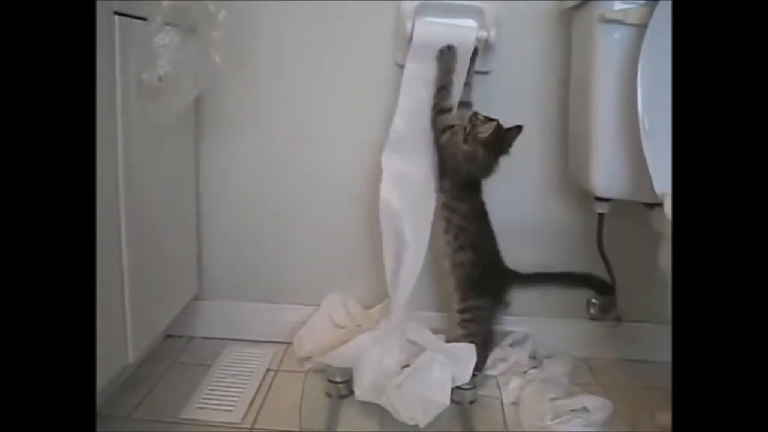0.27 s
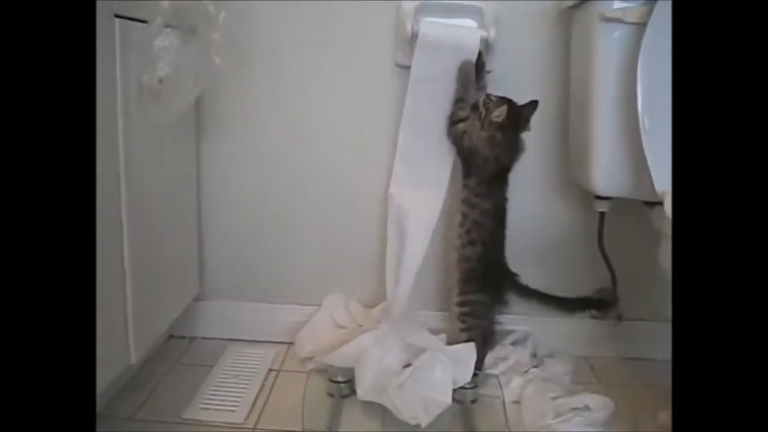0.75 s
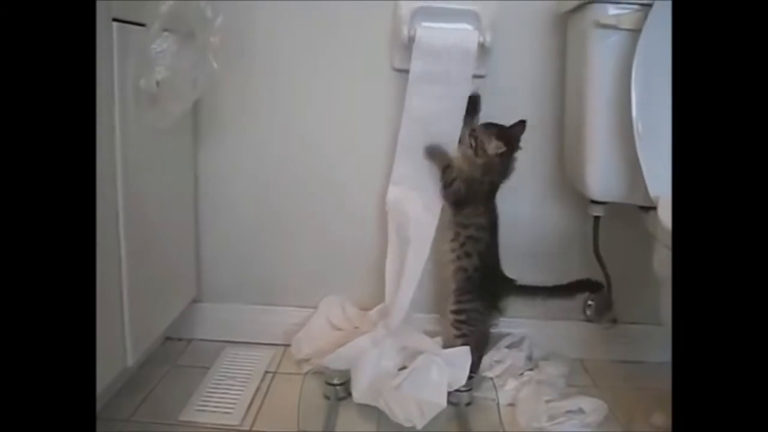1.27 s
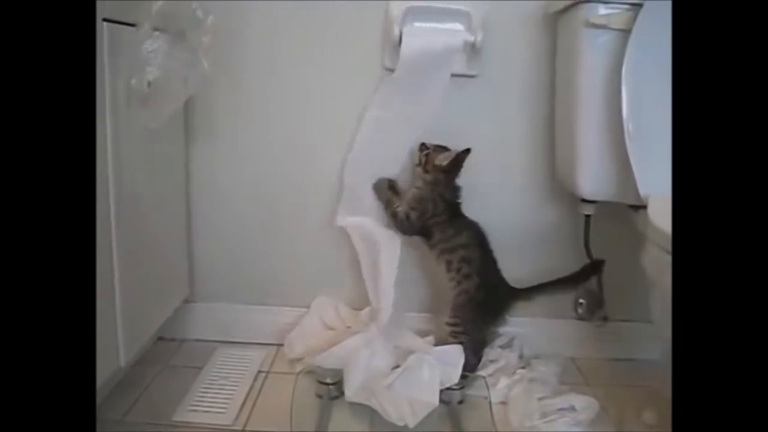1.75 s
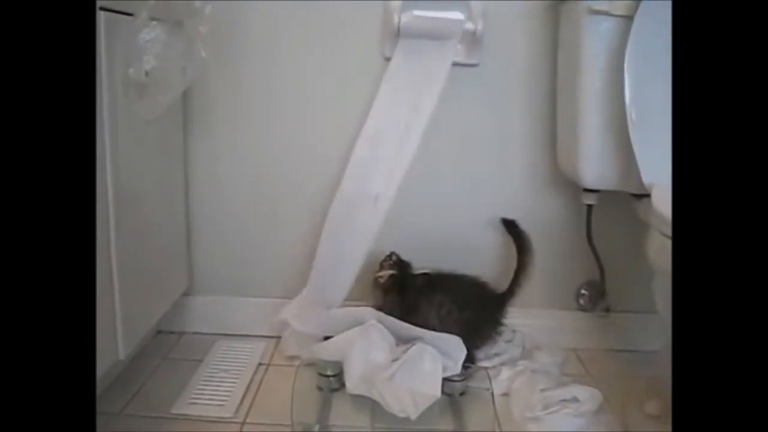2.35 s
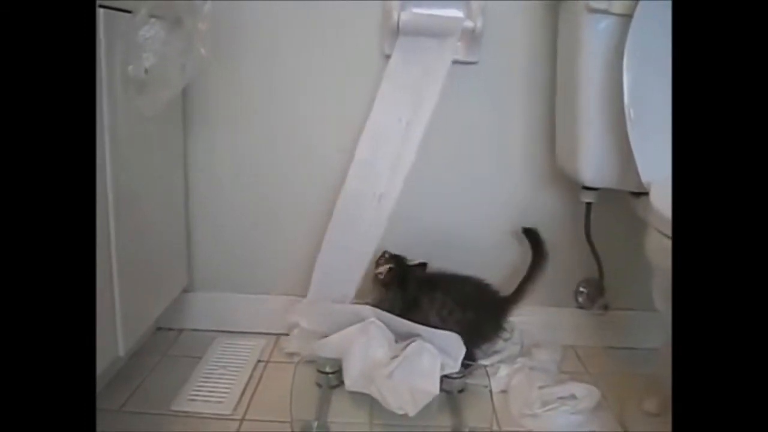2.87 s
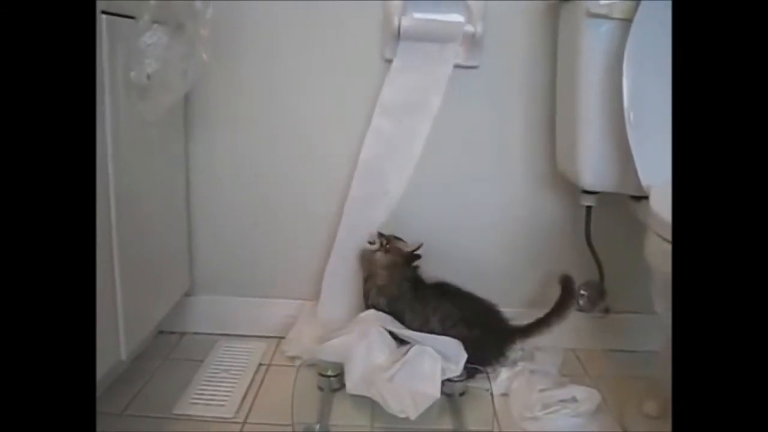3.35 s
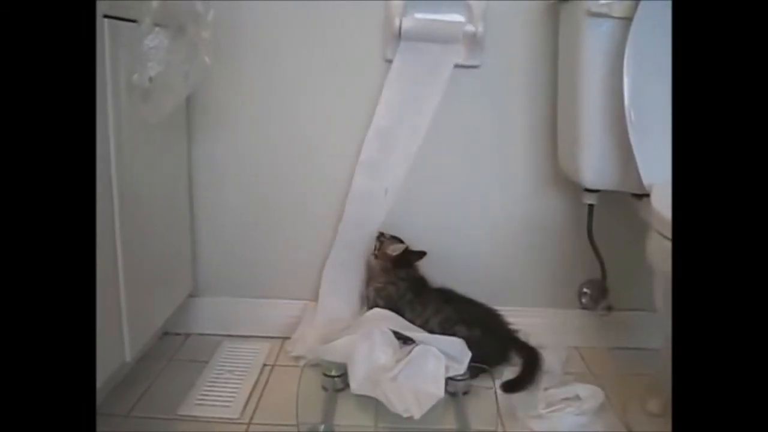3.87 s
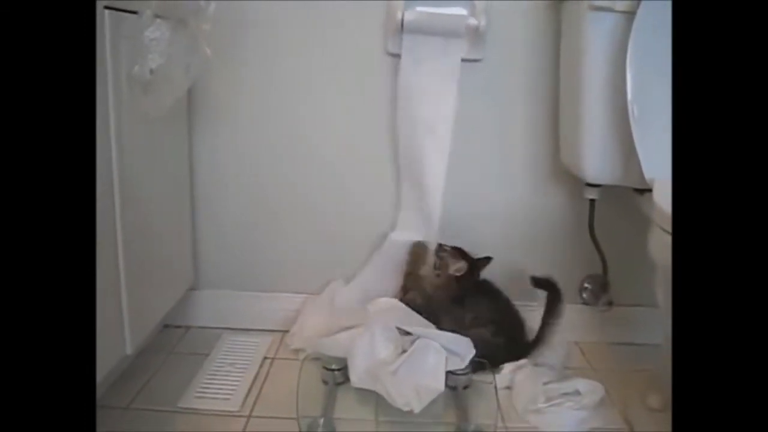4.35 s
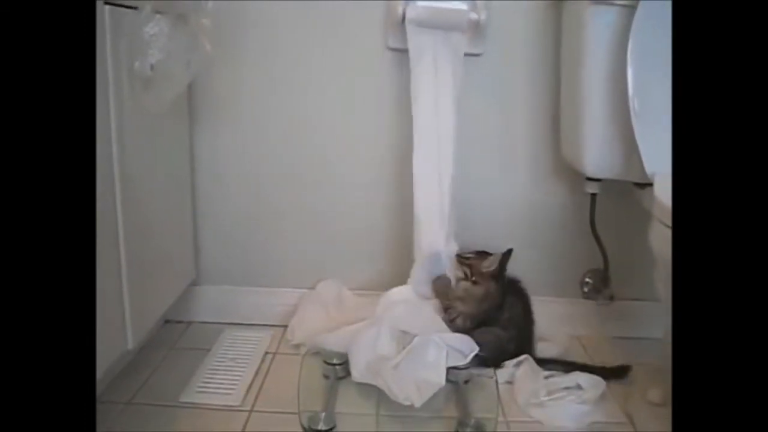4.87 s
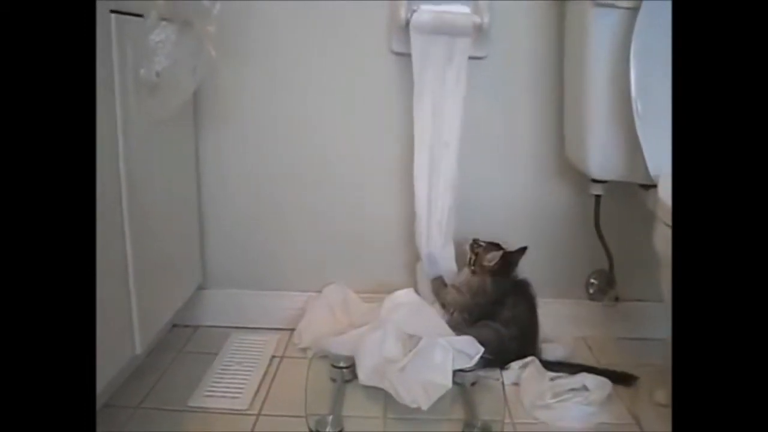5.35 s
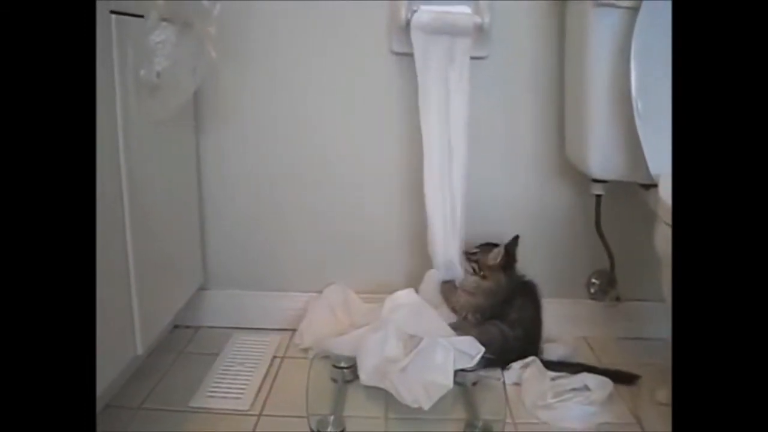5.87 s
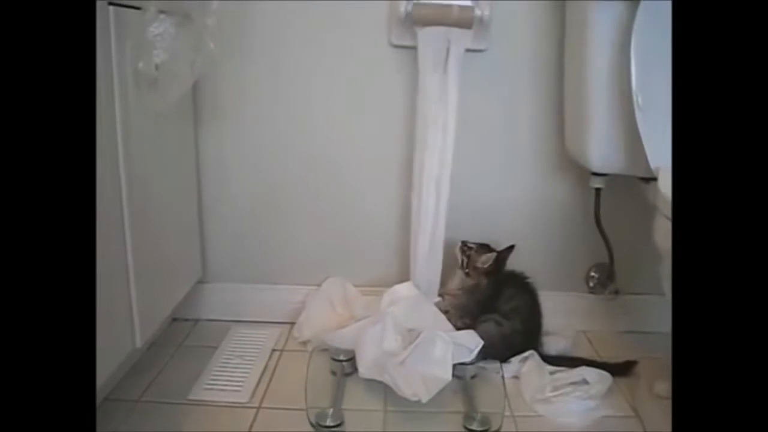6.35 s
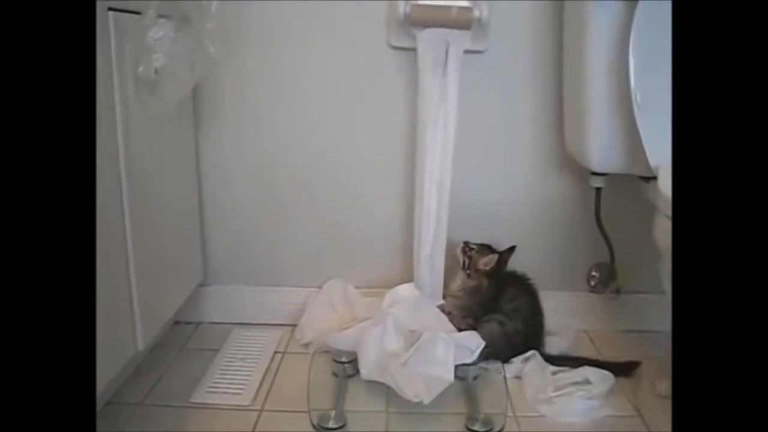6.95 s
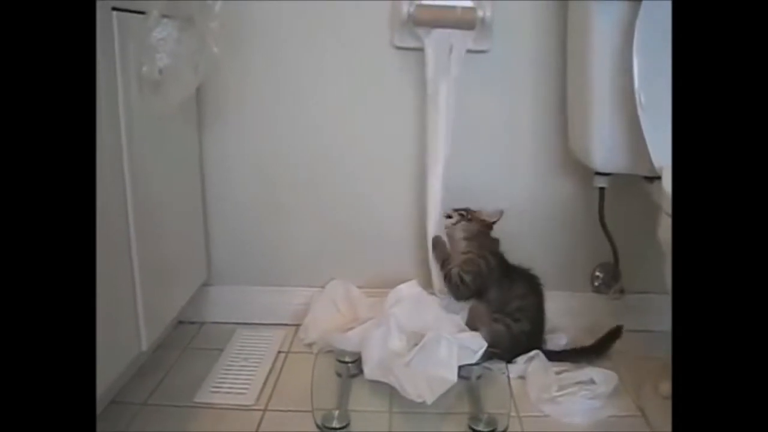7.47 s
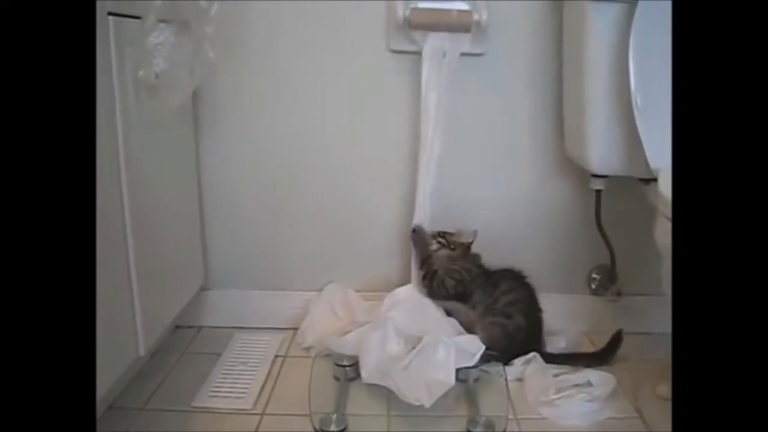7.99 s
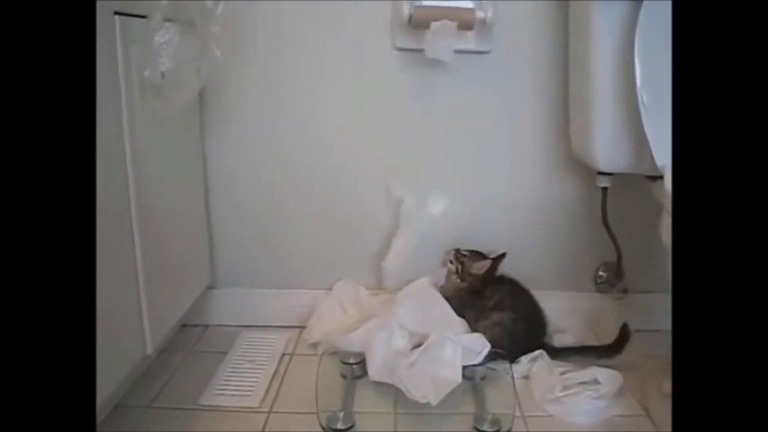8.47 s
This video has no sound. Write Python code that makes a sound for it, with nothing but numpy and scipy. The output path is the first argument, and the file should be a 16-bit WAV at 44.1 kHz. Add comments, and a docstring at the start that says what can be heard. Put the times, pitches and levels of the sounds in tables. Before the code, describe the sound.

In a small tiled bathroom, a kitten paws at hanging tissue. Loud plastic clacks and cardboard knocks come with the first swipes, then a rumbling turn of the tube ends in a sharp snap around two seconds. A quiet stretch follows, then scattered crinkles and small snaps, a strong crackling tug near six seconds, and a final tearing flurry. Fixed microphone nearby, faint ventilation hum.

```python
"""In a small tiled bathroom a kitten claws and tugs tissue paper off a wall roll.
The paper is clumped cracks and friction noise under swelling envelopes; snaps are short tuned noise bursts.
The plastic spindle clacks and the cardboard tube knocks as struck resonant modes; the loose tube also rubs.
The room adds an echo and a diffuse tail; a ventilation hum and faint hiss of filtered noise lie underneath."""
import sys
import numpy as np
from scipy import signal
from scipy.fft import rfft, irfft
from scipy.io import wavfile

SR = 44100
rng = np.random.default_rng(int(sys.argv[2]) if len(sys.argv) > 2 else 0)


def int16_out(signal):
    """Quantize to a 16-bit WAV file."""
    q = np.round(np.clip(np.atleast_2d(signal).T, -1, 1) * 32767)
    wavfile.write(sys.argv[1], SR, q.astype(np.int16))


N = 384544

# Tugs and swipes at the paper; swell and fade are the times for 20 dB. Each row: start of full strength
# in seconds, level in dB, swell in seconds, hold in seconds, fade in seconds, brightness in dB.
TUGS = [(0.103, -31, 0.022, 0.098, .13, -6), (0.256, -43.5, .05, 0.032, 0.06, 5),
        (0.372, -47.5, 0.0084, .03, 0.091, 9), (0.422, -37, .06, 0.08, 0.049, 2),
        (0.57, -39, 0.0062, 0, 0.11, 4), (0.9, -51.5, 0.05, 0.012, 0.083, 1),
        (1.002, -53, 0.078, 0.036, 0.058, 1.5), (1.16, -45, .015, 0.02, 0.053, 4.5),
        (1.271, -35.5, 0.011, 0.00064, 0.084, 2.5), (1.553, -48, 0.035, 0, 0.14, -0.5),
        (1.79, -44.5, 0.11, 0.13, .05, -3), (1.934, -30.5, 0.052, 0.14, 0.091, -2),
        (2.948, -48, 0.084, 0.059, 0.068, 0.5), (3.748, -51, 0.023, 0, 0.11, -8.5),
        (4.192, -47.5, .005, 0.055, 0.11, -1.5), (4.358, -52.5, 0.11, 0.019, .15, -1),
        (4.455, -50, 0.091, 0.12, 0.26, -1.5), (4.684, -55.5, 0.039, 0.029, 0.11, 10),
        (4.784, -39, 0.071, 0.022, 0.21, -0.5), (4.905, -47, .05, 0.011, 0.22, 2),
        (5.135, -45, 0.22, .03, .05, 3), (5.242, -47, 0.16, 0.004, 0.064, 5),
        (5.44, -60, 0.027, 0, 0.22, 5.5), (5.82, -68, 0.074, 0, .07, 4), (6.081, -40.5, .12, 0.15, 0.13, 8),
        (6.208, -31, 0.13, 0.06, 0.1, -2.5), (7.034, -39.5, 0.037, 0.036, 0.11, -0.5),
        (7.251, -48, 0.19, 0.085, 0.09, -1), (7.356, -44.5, 0.0081, 0.036, 0.11, 1),
        (7.526, -47.5, 0.068, 0.019, 0.14, 1), (7.678, -52.5, .05, 0.064, .05, 2),
        (7.743, -39, 0.084, 0.0063, 0.16, 2.5), (7.872, -52.5, .02, 0.011, .07, -11),
        (8.028, -48.5, 0.043, 0, .1, 5), (8.073, -47, 0.018, 0.028, .05, 6),
        (8.138, -33, 0.022, 0.031, 0.073, 4), (8.218, -36.5, 0.11, 0.089, 0.12, 3),
        (8.434, -44, 0.16, 0.074, 0.15, -1)]
# Faint rustle of the hanging strip and the heap between tugs. Each row: time in seconds, level in dB.
STIR = [(0, -57.5), (0.7, -68), (0.85, -67.5), (1.5, -61.5), (2.3, -56.5), (2.4, -64), (2.8, -70.5),
        (3.1, -57), (3.7, -62), (4.15, -66), (4.3, -55.5), (5.3, -58.5), (5.55, -74.5), (5.9, -62),
        (6.499, -68.5), (6.9, -68), (7.2, -66.5), (8.72, -59.5)]
# Paws and body landing on floor and heap. Each row: start of full strength in seconds, level in dB,
# hold in seconds.
THUMPS = [(0.125, -46.5, 0.11), (0.583, -53, 0.022), (1.286, -46, 0.024), (1.62, -60.5, 0.18),
          (1.924, -46, 0.2), (4.57, -60.5, 0.11), (4.794, -48.5, 0.029), (5.14, -64, 0.11),
          (6.25, -51.5, 0.053), (7.05, -60, 0.026), (7.326, -58, 0.13), (7.74, -60, .03),
          (8.227, -54.5, 0.085)]
# Claws and creases snapping. Each row: start in seconds, peak in dB, pitch in Hz.
SNAPS = [(0.371, -36, 5350), (0.4744, -32, 3700), (0.4933, -30, 2290), (1.5574, -36, 5970),
         (1.6144, -33, 3300), (1.9674, -14, 4000), (1.996, -21, 1570), (2.043, -24, 1490),
         (2.93, -39, 2360), (3.278, -41, 4140), (3.7473, -36, 1590), (4.1854, -36, 2960),
         (4.1993, -28, 2890), (4.2179, -25.5, 2960), (4.246, -33.5, 1710), (4.479, -34, 1540),
         (4.589, -35, 3600), (4.6777, -29.5, 4530), (4.703, -34, 4460), (4.7499, -28.5, 4230),
         (4.897, -28.5, 5930), (4.971, -32, 4000), (5.024, -33, 3840), (5.0506, -27, 3840),
         (5.0942, -29.5, 3900), (5.112, -35, 9000), (5.128, -24, 3800), (5.148, -33, 4800),
         (5.228, -31.5, 3870), (5.4415, -48, 5070), (5.7109, -50, 4090), (5.7805, -46, 3830),
         (5.8127, -33, 5300), (6.0013, -36, 3150), (6.0454, -28.5, 4300), (6.07, -31, 4000),
         (6.116, -18.5, 3270), (6.127, -23, 4300), (6.144, -19.5, 6070), (6.177, -20, 3900),
         (6.2077, -15, 4100), (6.228, -18.5, 5570), (6.741, -47, 2630), (6.902, -41, 1960),
         (7.238, -31, 2900), (7.2784, -31, 8940), (7.3073, -27.5, 1940), (7.3557, -29.5, 5500),
         (7.382, -32, 4600), (7.414, -29.5, 3120), (7.5009, -34.5, 4920), (7.573, -38, 8000),
         (7.674, -28.5, 4030), (7.7176, -27, 4080), (7.738, -26, 5110), (7.791, -32, 4860),
         (7.872, -32.5, 1580), (8.031, -31.5, 4900), (8.073, -32.5, 3880), (8.1349, -21.5, 4240),
         (8.145, -30, 3890), (8.161, -19.5, 3970), (8.1833, -18.5, 4900), (8.2194, -37, 2800),
         (8.259, -22.5, 2450), (8.358, -24, 8100), (8.3772, -26, 2500), (8.4402, -30, 2500)]
# Spindle clacking in its holder. Each row: start in seconds, nominal peak in dB, brightness in dB per octave.
CLACKS = [(0.085, -22, -5.5), (0.098, -10.5, -7), (0.1011, -7, -4.5), (0.1587, -18, -3), (0.5727, -12, 8),
          (0.892, -36.5, -3), (0.9034, -35, -9), (0.974, -40, -12), (0.993, -35.5, -3), (1.014, -33.5, -3),
          (1.029, -37, 0), (1.133, -35.5, 4), (1.1686, -35.5, -3), (1.265, -20, -5), (1.565, -38, -6),
          (1.649, -44, -3), (1.6693, -39, -30), (1.7808, -26.5, -13), (1.8357, -42, -3), (1.8817, -23, -9),
          (1.9103, -12, -11), (1.954, -13.5, -27)]
# Tube knocking on the spindle. Each row: start in seconds, nominal peak in dB, hollowness from 0 to 1.
KNOCKS = [(0.1022, -13.5, 0.25), (0.1561, -18.5, 0.27), (0.4216, -37, 0.4), (0.8928, -40.5, 0.48),
          (1.1333, -50, 0.8), (1.2804, -14.5, 0), (1.2911, -13.5, 0.05), (1.5957, -31, 0.52),
          (1.6697, -35.5, 0.55), (1.735, -27, 0.46), (1.782, -32.5, 0.1), (1.8374, -35, 0.4),
          (1.8885, -24, 0.4), (1.928, -35, 0.2), (1.9565, -17, 0.53)]
# Loose tube rubbing round the spindle. Each row: time in seconds, mean level in dB.
ROLLING = [(1.52, -74), (1.56, -64), (1.594, -54), (1.702, -55.5), (1.728, -54.5), (1.858, -47.5),
           (1.884, -48), (1.98, -41), (2.026, -40), (2.12, -62)]

# Resonant modes of the spindle, the tube's wall and the air inside the tube, when struck.
# Each row: frequency in Hz, relative level in dB, time to decay by 60 dB in seconds.
SPINDLE = [(3050, -21, .015), (3800, -12, .018), (4050, -7, .024), (4230, -9, .024), (4680, -8, .02),
           (5450, -9, .026), (5800, -10, .026), (6100, -11, .026), (6800, -18, .015), (8800, -19, .008),
           (10500, -18, .006)]
TUBE_WALL = [(840, -40.5, 0.0069), (1417, -32, 0.0084), (1590, -14, 0.053), (1870, -4, .012),
             (1960, -11, 0.0057), (2400, -22, 0.01), (2460, -16.5, 0.0094), (3100, -18, 0.042)]
TUBE_AIR = [(580, -6, .07), (985, -9, .04), (1355, 0, .09)]

# Spectra of the paper's rustle, its crisp treble and its fuller middle, of the thumps, and of the hiss.
# Each row: frequency in Hz, relative density in dB per Hz.
RUSTLE = [(470, -12.5), (800, -5.5), (1300, 3), (1760, -3), (2180, 2.5), (3360, 1), (3770, 1.5),
          (4890, 1.5), (8000, -12), (10400, -19.5), (17600, -120)]
CRISP = [(2940, -68), (5000, -4), (6470, -2), (11400, 4.5), (14900, -3.5), (16000, -3)]
FULLNESS = [(180, -32), (300, -26), (319, -5.5), (573, 0.5), (807, -0.5), (975, 2.5), (1500, -6), (1950, 2),
            (3300, -120)]
WEIGHT = [(24, -58), (40, -19), (123, -8), (162, 7), (254, -2.5), (320, -8), (400, -0.5), (520, -3.5),
          (880, -120)]
HISS = [(12, -28), (20, -4.5), (88, -4.5), (216, -8), (301, -0.5), (399, -12.5), (718, -12), (923, -6.5),
        (1480, -19), (7730, -22.5), (16000, -27)]
# Duct resonances of the ventilation. Each row: frequency in Hz, bandwidth in Hz, nominal level in dB rms.
HUM = [(308, 18, -69), (921, 40, -64.5), (1136, 19, -73), (7700, 60, -77)]
# Reverberation of the room. Each row: frequency in Hz, time to decay by 60 dB in seconds.
ROOM_T60 = [(150, 1), (400, 0.71), (1000, 0.71), (2800, 0.52), (7300, 0.4), (14000, 0.14)]

# Paper layers against the rustle; brightness adds to the crisp layer and takes from the full one.
CRISP_DB, FULL_DB, WEIGHT_DB, CREASES_DB = -6.5, -8.5, -23.5, -10
STIR_BRIGHT_DB = -2.5
THUMP_SWELL_S, THUMP_FADE_S = 0.06, 0.18  # times for 20 dB
SHIVER_DB, SHIVER_FADE_S = -16, 0.033  # level against the snap's peak, time for 20 dB
SNAP_CYCLES = 5.5  # cycles in which a snap's resonance decays by 60 dB
CONTACT_S = 0.003  # longest delay of a mode within one blow
RATTLE_DB, RATTLE_T60_S = -36.5, 0.27  # loose parts chatter on after a blow
CRACK_DB, CRACK_S = -12.5, 0.0027  # bright edge of each clack: level, decay time constant
ROOM_DB, WALL_ECHO_S, WALL_ECHO_DB = -11.5, 0.0036, -23  # levels against the direct sound
HISS_DB = -62.5  # rms
TOP_STOP_HZ = 16377  # from here up the output is 60 dB down


def from_db(db):
    """Amplitude ratio by the definition of the decibel."""
    return 10 ** (np.asarray(db) / 20)


def rms_one(x):
    """Normalisation to unit root-mean-square."""
    return x / np.sqrt(np.mean(x ** 2) + 1e-20)


def at_hz(points, hz):
    """Interpolation along a logarithmic frequency axis."""
    point_hz, value = np.array(points).T
    return np.interp(np.log(hz), np.log(point_hz), value)


def drift(rate_hz):
    """Low-passed noise: a slow random wander of spread 1."""
    step = 40  # samples between computed points
    pole = np.exp(-2 * np.pi * rate_hz * step / SR)
    settle = 2000  # points dropped while the filter settles
    noise = rng.standard_normal(N // step + settle + 2)
    slow = signal.lfilter([1], [1, -2 * pole, pole * pole], noise)[settle:]
    return np.interp(np.arange(N) / step, np.arange(len(slow)), rms_one(slow))


def colour(x, spectrum):
    """Spectral shaping: weights each frequency of a signal; rms 1."""
    hz = np.maximum(np.fft.rfftfreq(len(x), 1 / SR), 1)
    return rms_one(irfft(rfft(x) * from_db(at_hz(spectrum, hz)), len(x)))


def ring(force, hz, t60):
    """Damped resonance: a unit click sets a decaying sine of height 1 ringing."""
    radius = from_db(-60 / (t60 * SR))
    angle = 2 * np.pi * hz / SR
    return signal.lfilter([0, np.sin(angle)], [1, -2 * radius * np.cos(angle), radius ** 2], force + 1e-18)


def gestures(s, level_db, swell, hold, fade):
    """Exponential envelopes: gestures swell, hold and fade straight in dB and their powers add; amplitude."""
    t = np.arange(0, N + 32, 32)[:, None] / SR
    before = (s - t) / np.maximum(swell, 0.002)
    after = (t - s - hold) / np.maximum(fade, 0.002)
    drop_db = 20 * np.clip(np.maximum(before, after), 0, 8)
    power = np.sum(from_db(level_db - drop_db) ** 2, axis=1)
    return np.interp(np.arange(N) / SR, t[:, 0], np.sqrt(power))


def paper():
    """Fracture and friction: fibres give way as clumped cracks over noise; heap and paws add a dull thump."""
    s, level_db, swell, hold, fade, bright_db = np.transpose(TUGS)
    stir_db = np.interp(np.arange(N) / SR, *np.transpose(STIR))

    def motion(side):
        tugs = gestures(s, level_db + side * bright_db, swell, hold, fade)
        return np.hypot(tugs, from_db(stir_db + side * STIR_BRIGHT_DB))

    rustle, crisp, full = motion(0), motion(1), motion(-1)

    # the sheet shivers after each snap
    snap_s, snap_db, _ = np.transpose(SNAPS)
    shiver = gestures(snap_s + 0.002, snap_db + SHIVER_DB, 0, 0, SHIVER_FADE_S)
    rustle, crisp = np.hypot(rustle, shiver), np.hypot(crisp, shiver)

    thump_s, thump_db, thump_hold = np.transpose(THUMPS)
    landings = gestures(thump_s, thump_db, THUMP_SWELL_S, thump_hold, THUMP_FADE_S)
    thump = np.hypot(landings, from_db(WEIGHT_DB) * rustle)

    clumps = from_db(1.5 * drift(80))
    sizes = from_db(3.0 * np.minimum(rng.exponential(1, N), 4)) * rng.choice([-1, 1], N)
    cracks = rms_one(sizes * (rng.random(N) < 6000 * clumps / SR))  # about 6000 per second
    fibres = clumps * (0.63 * cracks + 0.68 * rng.standard_normal(N))

    sheet = rustle * colour(fibres, RUSTLE)
    sheet += from_db(CRISP_DB) * crisp * colour(fibres, CRISP)
    sheet += from_db(FULL_DB) * full * colour(clumps * rng.standard_normal(N), FULLNESS)
    sheet += thump * colour(rng.standard_normal(N), WEIGHT)
    return sheet + from_db(CREASES_DB) * rustle * creases(per_s=900 * clumps)


def creases(per_s):
    """Buckling: small panels pop at random, each ringing at its pitch; favoured pitches drift; rms 1."""
    sizes = from_db(4.0 * np.minimum(rng.exponential(1, N), 3)) * rng.choice([-1, 1], N)
    pops = sizes * (rng.random(N) < per_s / SR)
    pitches = np.geomspace(1300, 9000, 14)
    dealt = rng.integers(0, len(pitches), N)
    out = np.zeros(N)
    for k, hz in enumerate(pitches):
        favour = from_db(5.6 * drift(6.5))  # changes as the sheet bends
        out += ring(pops * (dealt == k) * favour, hz, 45.0 / hz)
    return rms_one(out)


def snaps():
    """Impulsive excitation: a few ms of broad noise, coloured by resonance around the crease's own pitch."""
    length = 1024
    out, t = np.zeros(N + length), np.arange(length) / SR
    noise = np.diff(rng.standard_normal((len(SNAPS), length + 1)))  # differencing tilts it to the treble
    bursts = noise * np.exp(-(t / 0.0035) ** 2)
    for (s, peak_db, hz), burst in zip(SNAPS, bursts):
        sound = 0.55 * rms_one(burst) + rms_one(ring(burst, hz, SNAP_CYCLES / hz))
        start = int(s * SR)
        out[start:start + length] += from_db(peak_db) * sound / np.abs(sound).max()
    return out[:N]


def strike(times, peak_db, modes, tilt_db=0):
    """Modal excitation: a rolling contact starts each mode at its own moment, strength and sign."""
    at, out = np.asarray(times) * SR, np.zeros(N)
    chance = rng.random((len(at), len(modes), 3))
    chatter = from_db(RATTLE_DB) * rng.standard_normal(N)
    rattle_pole = from_db(-60 / (RATTLE_T60_S * SR))
    for k, (hz, mode_db, t60) in enumerate(modes):
        late, strength, sign = chance[:, k].T
        # harder contact favours the high modes
        level_db = peak_db + mode_db + tilt_db * np.log2(hz / 4700) + 5 * (strength - 0.5)
        start = (at + late ** 2 * CONTACT_S * SR).astype(int)
        force = np.zeros(N)
        force[start] = from_db(level_db) * np.sign(sign - 0.5)
        force += chatter * signal.lfilter([1], [1, -rattle_pole], np.abs(force) + 1e-18)  # dying chatter
        out += ring(force, hz, t60)
    # small bodies radiate no bass
    band_hz = [0.6 * modes[0][0], 1.3 * modes[-1][0]]
    return signal.sosfilt(signal.butter(2, band_hz, "band", fs=SR, output="sos"), out)


def roll():
    """Struck resonators: clacks ring the spindle; knocks ring the tube's wall or, when hollow, its air."""
    s, clack_db, tilt_db = np.transpose(CLACKS)
    clacks = strike(s, clack_db, SPINDLE, tilt_db)

    edge = np.zeros(N)
    edge[(s * SR).astype(int)] = from_db(clack_db + CRACK_DB)
    crack_level = signal.lfilter([1], [1, -np.exp(-1 / (CRACK_S * SR))], edge + 1e-18)
    clacks += colour(rng.standard_normal(N), CRISP) * crack_level

    s, knock_db, hollow = np.transpose(KNOCKS)
    hollow = np.clip(hollow, 0.01, 0.99)
    wall = strike(s, knock_db + 20 * np.log10(2 - 2 * hollow), TUBE_WALL)
    air = strike(s, knock_db + 20 * np.log10(hollow), TUBE_AIR)
    return clacks + wall + air


def rolling():
    """Friction-driven resonance: uneven rubbing keeps the air in the turning tube sounding."""
    s, level_db = np.transpose(ROLLING)
    path_db = np.interp(np.arange(N) / SR, s, level_db, left=-120, right=-120)
    air = np.zeros(N)
    for hz, mode_db, t60 in TUBE_AIR:
        # the rubbed air is damped sooner than the struck air
        air += from_db(mode_db) * ring(rng.standard_normal(N), hz, 0.26 * t60)
    return from_db(path_db + 3.9 * drift(25)) * rms_one(air)


def bathroom(x):
    """Reverberation: one near wall echo, then a diffuse tail that dies band by band."""
    t, edges = np.arange(SR) / SR, 60 * 2 ** np.arange(0, 8.3, 0.5)  # half-octave band edges in Hz
    white, tail = rng.standard_normal((2, SR)), np.zeros(SR)
    for k, (low, high) in enumerate(zip(edges, edges[1:])):
        band_filter = signal.butter(2, [low, high], "band", fs=SR, output="sos")
        band = signal.sosfilt(band_filter, white[k % 2])  # neighbouring bands use separate noises
        t60 = at_hz(ROOM_T60, np.sqrt(low * high))
        tail += band * from_db(-60 * t / t60)
    tail *= np.clip(t / 0.0078 - 0.4, 0, 1)  # reflections build up between 3 and 11 ms
    tail *= from_db(ROOM_DB) / np.sqrt(np.sum(tail ** 2))
    tail[0] = 1  # direct sound
    tail[int(WALL_ECHO_S * SR)] += from_db(WALL_ECHO_DB)
    return signal.fftconvolve(x, tail)[:N]


def background():
    """Noise-driven resonance: steady hiss with a few duct resonances of wandering level."""
    out = from_db(HISS_DB) * colour(rng.standard_normal(N), HISS)
    for hz, width_hz, level_db in HUM:
        t60 = np.log(1000) / (np.pi * width_hz)  # a narrower resonance decays more slowly
        duct = rms_one(ring(rng.standard_normal(N), hz, t60))
        out += from_db(level_db + 2.2 * drift(3.1)) * duct
    return out


def scene():
    """Superposition: the kitten keeps moving, so the room answers from three places in slow turn."""
    dry = paper() + snaps() + roll() + rolling()
    turn = 2 * np.pi * np.arange(N) / SR / 1.9  # one round of the places takes 1.9 s
    out = background()
    for k in range(3):
        share = np.cos(turn / 2 + k * np.pi / 3) ** 2 * 2 / 3  # the three shares sum to 1
        out += bathroom(dry * share)
    return out[None]


def record(dry):
    """Saturation and band limiting: peaks are rounded, the top is cut steeply."""
    rounded = 0.7 * np.tanh(dry / 0.7)
    return signal.sosfilt(signal.cheby2(16, 60, TOP_STOP_HZ, fs=SR, output="sos"), rounded)


dry = scene()
out = record(dry)
int16_out(out)
```